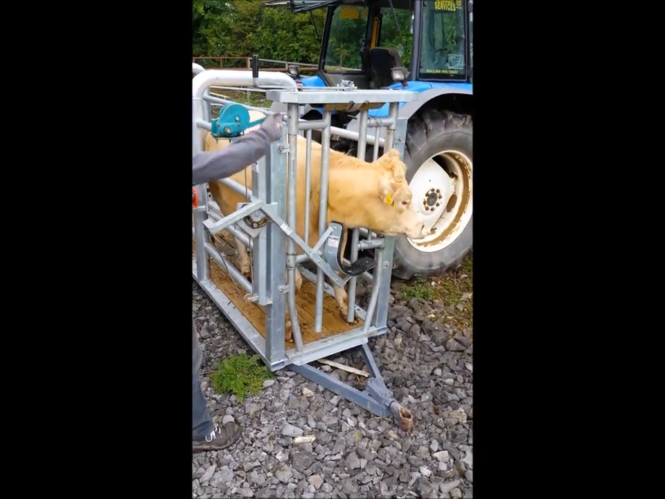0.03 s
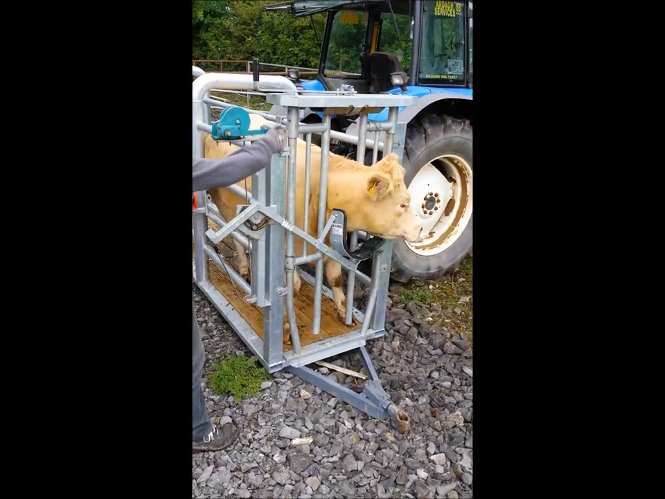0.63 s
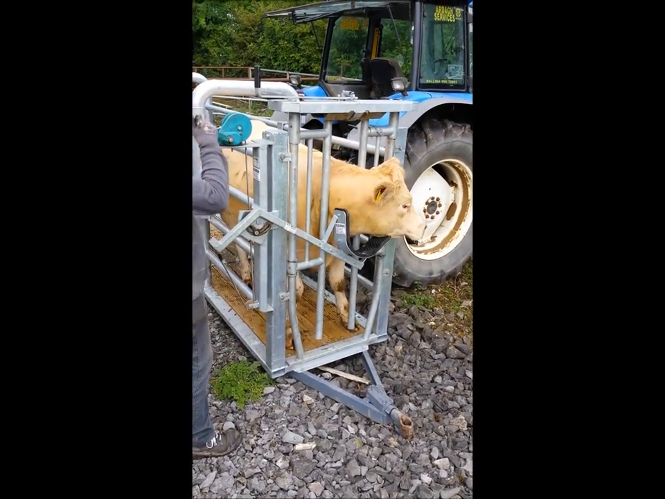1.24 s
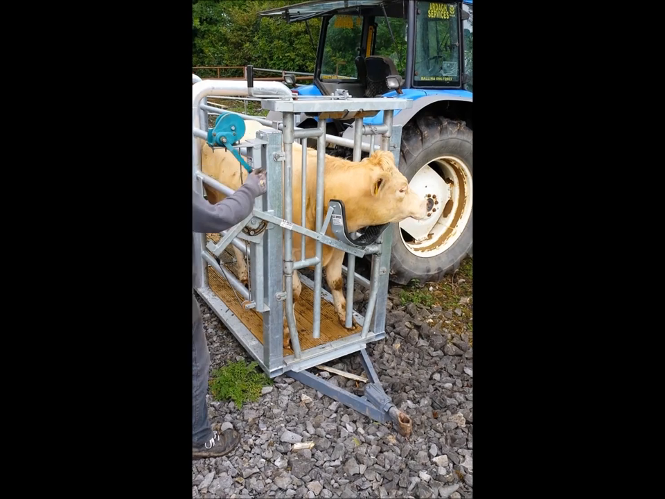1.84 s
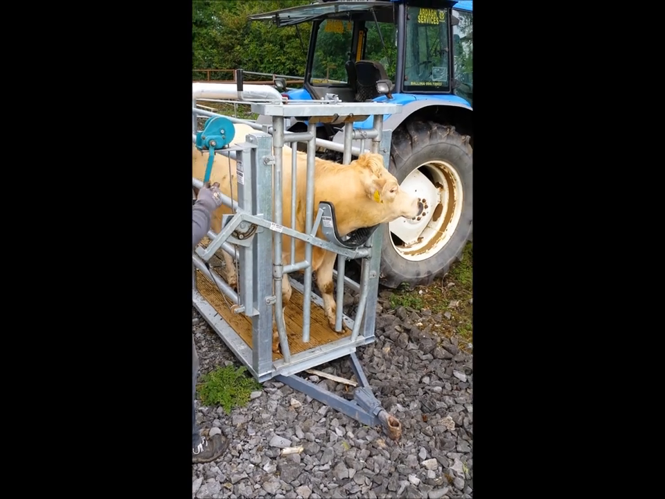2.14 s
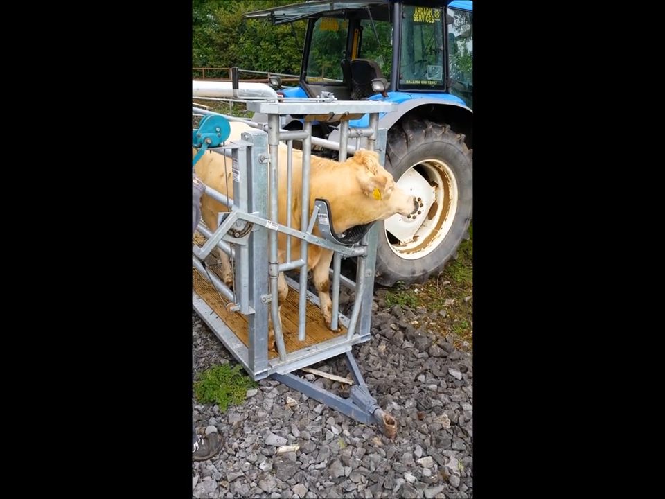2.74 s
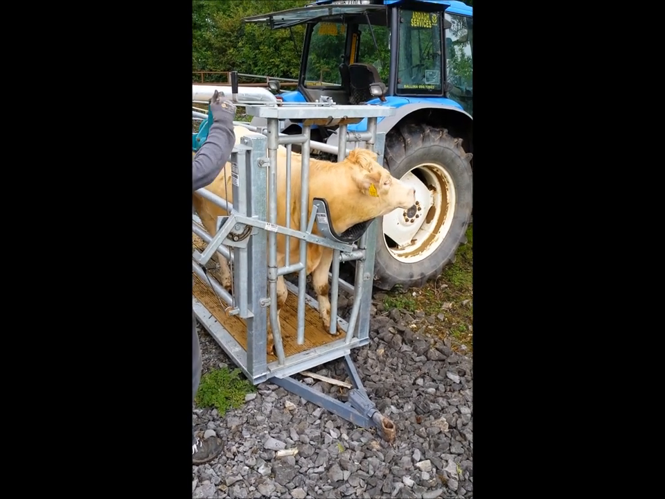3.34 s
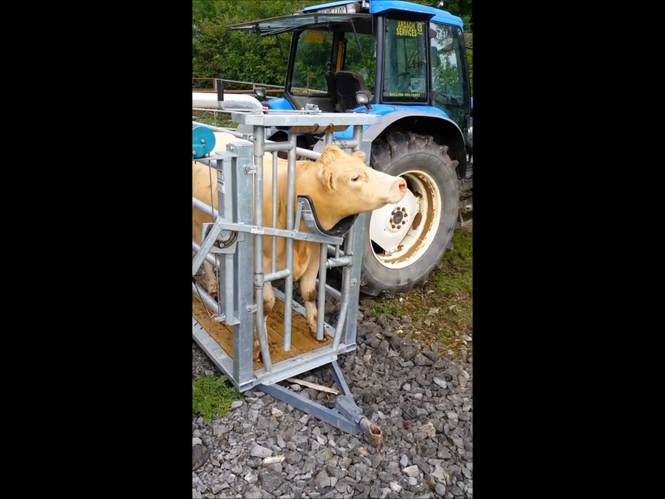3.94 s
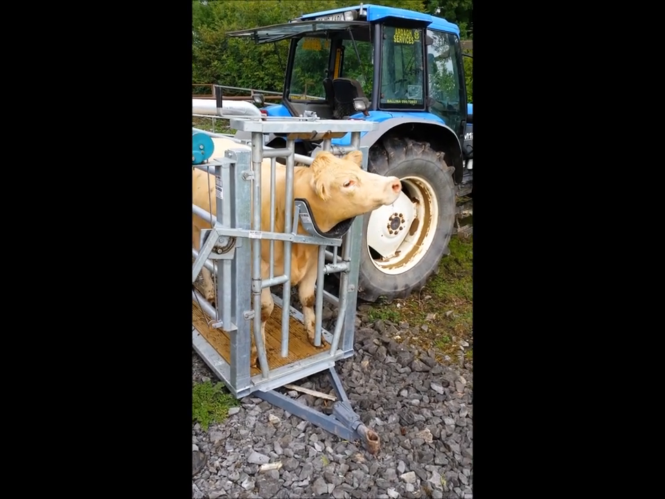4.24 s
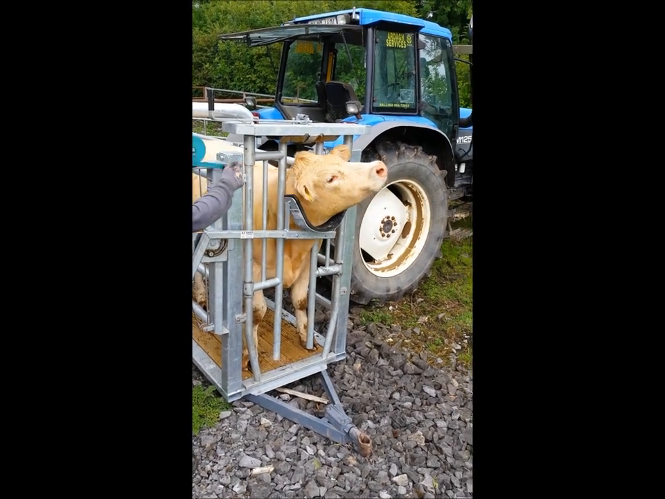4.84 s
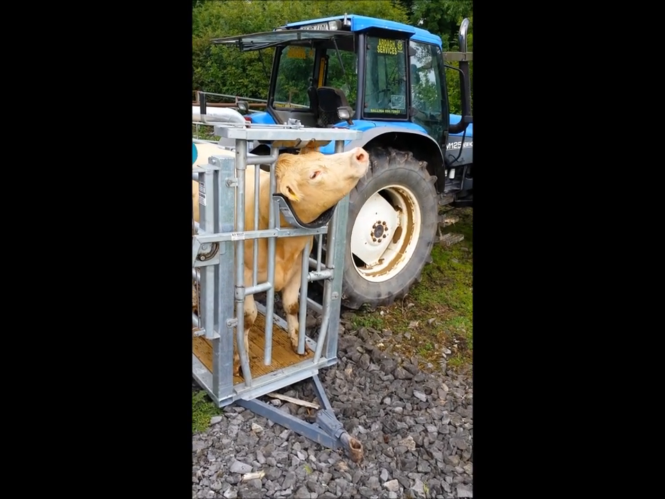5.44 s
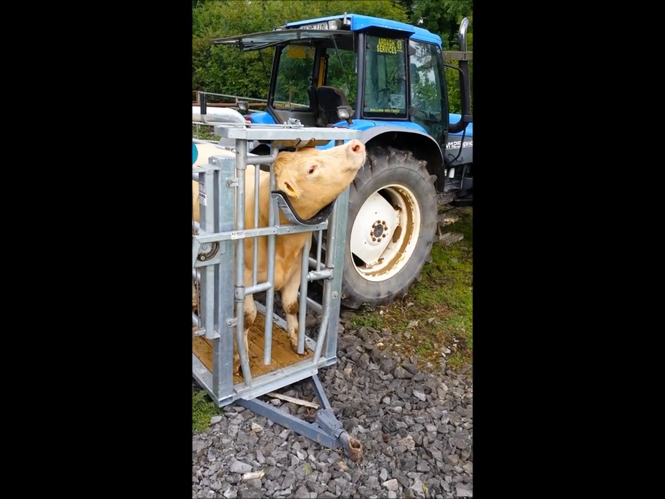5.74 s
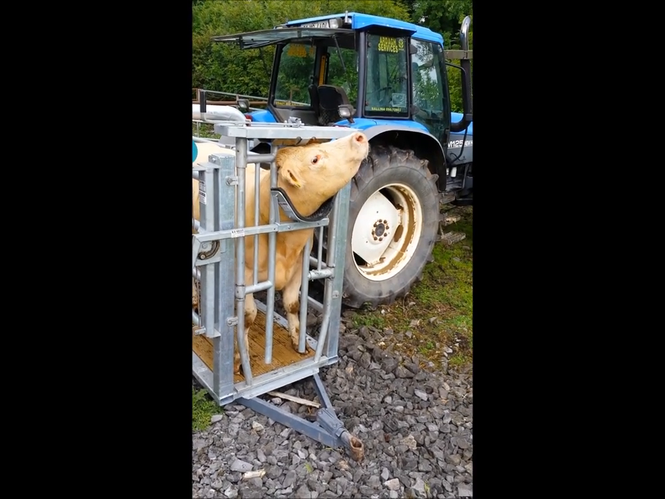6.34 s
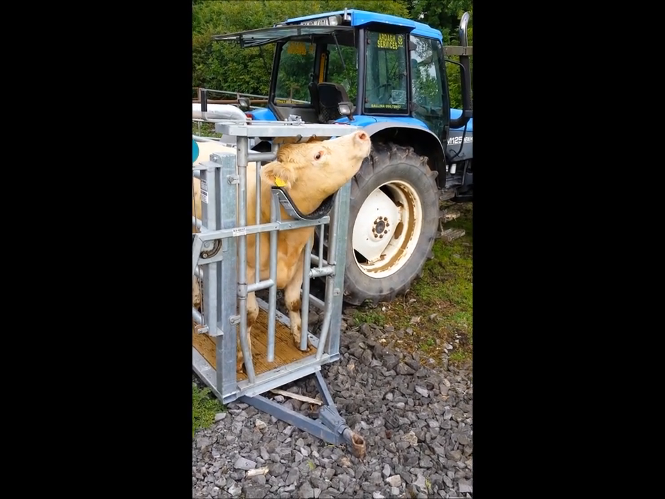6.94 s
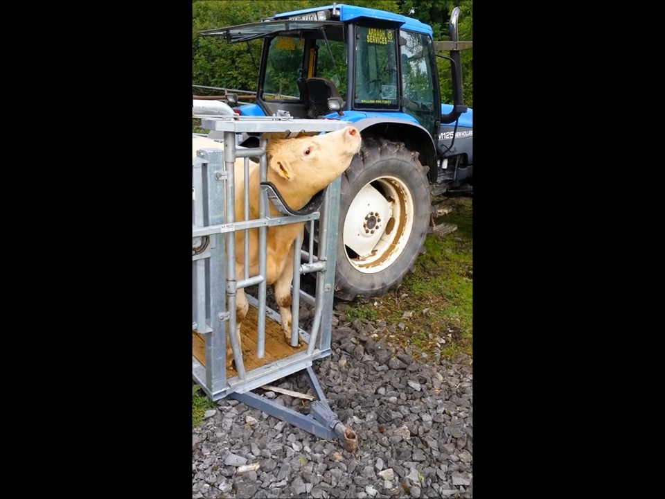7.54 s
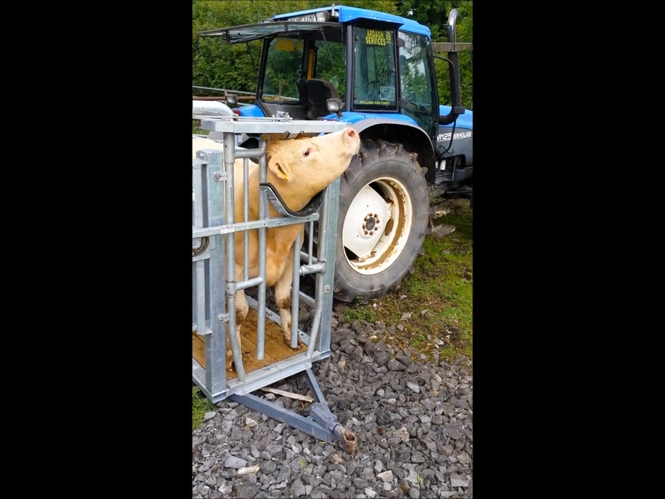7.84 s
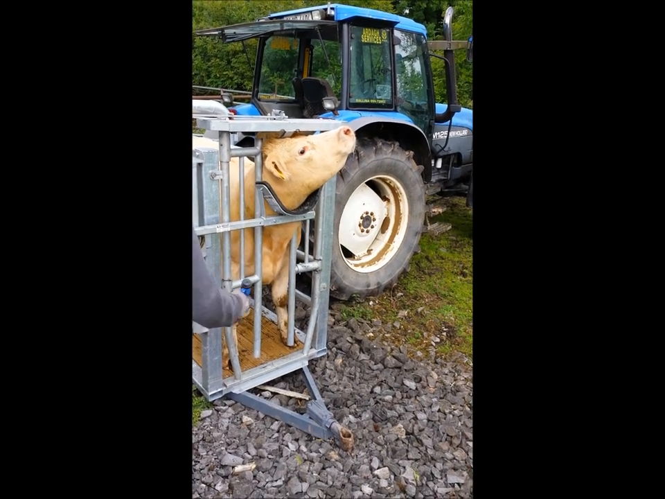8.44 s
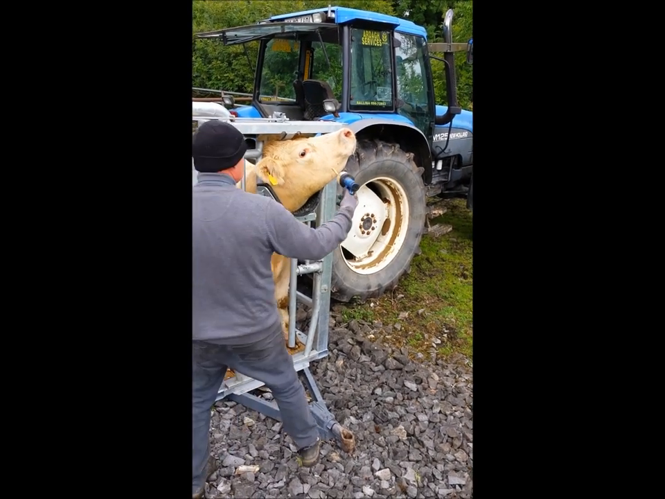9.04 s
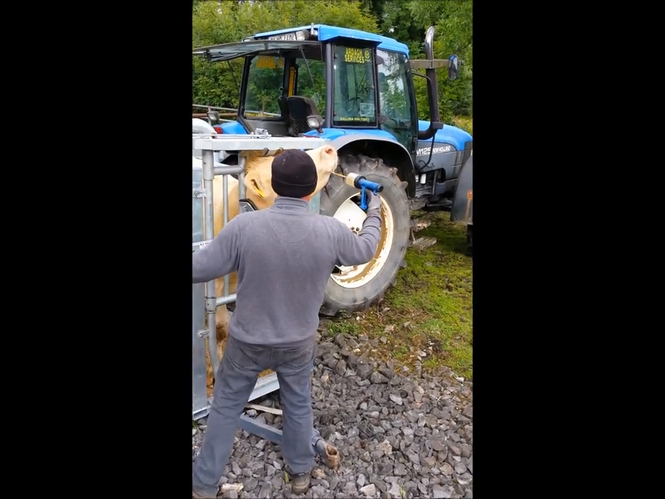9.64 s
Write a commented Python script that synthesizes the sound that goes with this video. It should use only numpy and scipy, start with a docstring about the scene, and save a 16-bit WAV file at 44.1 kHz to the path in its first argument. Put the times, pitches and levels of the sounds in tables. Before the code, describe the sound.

A hand winch on a steel cattle crush starts at once with very fast, bright, ringing ratchet clicks, and a loose steel part rings once. From about 1 second the clicks slow into uneven runs, pausing briefly around 2.5 seconds, where soft wind puffs touch the microphone and a bird whistles thinly. The animal bumps the panels with dull booms, faint at first and stronger from 3 to 4.5 seconds. A loud steel clank lands just after 4 seconds, and several more follow between 5.3 and 5.8. The ratchet stops at about 6 seconds. Boots then grind over gravel until nearly 10 seconds, with sharp cracks of stones loudest from 7.5 to 8.7, while small birds chirp faintly. Quiet outdoor air and rustling leaves run underneath. All of this is on the left; the right holds only steady microphone hiss.

```python
"""Fast, then slower ratchet clicks with steel booms and clanks; then boots on gravel and small birds.
A hand winch lifts the head scoop of a steel cattle crush in an open yard. The pawl drops tooth by
tooth, ringing wheel and frame, while the animal bumps the panels. Stones grind and crack under the
boots; wind puffs and leaves rustle. All of this is on the left; the right is steady microphone hiss."""
import sys
import numpy as np
from scipy import signal
from scipy.fft import rfft, irfft, next_fast_len
from scipy.io import wavfile
from scipy.ndimage import uniform_filter1d, minimum_filter1d, map_coordinates

SR = 44100
rng = np.random.default_rng(int(sys.argv[2]) if len(sys.argv) > 2 else 0)


def materialize(psi):
    """Save the field psi as 16-bit PCM at rate SR to the path in sys.argv[1].

    A 1-D psi becomes a single channel; in a 2-D psi each row is a channel.
    """
    bounded = np.clip(np.atleast_2d(psi).T, -1, 1)
    quanta = np.round(bounded * 32767).astype(np.int16)
    wavfile.write(sys.argv[1], SR, quanta)


N = 427769
RING_TIME_S = np.arange(SR // 2) / SR

# Pushes on the crank. Each row: start in seconds, teeth passed, first, middle and last gap in seconds.
CRANK_PUSHES = [(0.0003, 13, .0241, .0232, .0275), (.3257, 14, .0368, .0301, .024),
                (.748, 8, .0306, .0358, .0865), (1.1748, 8, .069, .0437, .0809),
                (1.6512, 7, .0452, .0416, .0429), (1.9547, 4, .0818, .1481, .125),
                (2.8398, 5, .097, .0657, .0683), (3.2489, 4, .0768, .0829, .0649),
                (3.5356, 6, .0591, .0524, .0317), (3.8174, 4, .0476, .063, .0564),
                (4.045, 4, .0708, .1153, .0753), (4.391, 6, .0946, .064, .0797),
                (4.8206, 7, .0517, .0468, .0704), (5.2188, 5, .0777, .1062, .147),
                (5.739, 4, .0855, .0852, .1104)]
# Each row: time in seconds, click level in dB, toothed wheel's resonance in Hz.
CLICK_CURVE = [(0, -18, 5620), (.15, -17, 6230), (.3, -17.6, 5420), (.5, -18, 5450), (.7, -17.5, 6630),
               (.95, -17.5, 5220), (1.42, -20, 5700), (1.8, -18.5, 5470), (2.2, -20, 5540),
               (2.85, -17.5, 5440), (3.15, -20, 5820), (3.78, -18, 5710), (4.08, -21.5, 5940),
               (4.45, -18.5, 6430), (4.74, -22, 6320), (5.0, -18.5, 5740), (5.5, -17, 5790),
               (6.02, -20, 6320)]
# The pawl's lower pings fade as the scoop takes the weight.
# Each row: time in seconds, gain near 2.9 kHz in dB, gain near 4.2 kHz in dB.
PING_CURVE = [(0, 3, 2), (.22, 3, 4.5), (.35, 1, -0.5), (.55, 1.5, 2.5), (.72, 5, 2), (1.05, 2.5, 3),
              (1.35, -0.5, 0), (1.9, -1, 2), (2.1, -3.5, -2.5), (3.1, -3, -1.5), (3.5, .5, -4.5),
              (3.8, -0.5, -2), (4.05, -.5, 1.5), (4.45, -.5, -1.5), (4.85, 0, -2.5), (5.2, -5, -2),
              (5.5, 1, -3), (5.95, -7, -6)]
# Each row: start in seconds, level in dB, tilt in dB per octave, rise in seconds.
ANIMAL_BUMPS = [(1.231, -32.5, -3.5, 0.0066), (1.32, -33, -3, 0.014), (1.868, -32.5, 0, 0.025),
                (2.949, -23, 0, 0.0028), (3.008, -23.5, 1.5, 0.006), (3.056, -24, -2, 0.0035),
                (3.311, -24, 2, 0.0021), (3.466, -21.5, 1, 0.0053), (3.575, -20.5, 1.5, 0.0018),
                (4.552, -18, 1.5, 0.0022), (5.02, -36, 0.5, 0.012)]
# Each row: start in seconds, level in dB, tilt in dB per octave, relative ring of the bars in dB.
STEEL_CLANKS = [(4.1437, -9, -1.6, -22), (5.288, -17.5, -4, -8.5), (5.645, -21, -1, -20),
                (5.658, -21.5, -5, -5), (5.707, -17.5, -3.5, -10), (5.78, -17.5, -1.5, -14.5)]
# Each row: start in seconds, level in dB, rise and t60 in seconds, relative level of the sole in dB.
BOOT_STEPS = [(6.25, -31, 0.0037, 0.16, -9), (6.459, -25.5, 0.0014, 0.15, -10),
              (6.616, -27, 0.0028, 0.15, -6), (7.205, -16, .011, 0.088, -13),
              (7.235, -28.5, 0.0081, 0.4, -6), (7.498, -19.5, 0.0026, 0.15, -19),
              (7.548, -21.5, 0.017, 0.18, -20), (7.583, -15, 0.0095, 0.16, -20),
              (7.817, -21, 0.0025, 0.24, -20), (7.845, -26.5, 0.0069, 0.38, -12),
              (7.921, -23.5, 0.0096, 0.072, -14), (8.051, -36, 0.071, 0.46, -13),
              (8.172, -26.5, 0.0035, 0.21, -16), (8.362, -18, 0.00085, 0.081, -12.5),
              (8.56, -32.5, 0.045, 0.55, -9), (8.655, -19.5, 0.031, 0.18, -4),
              (9.268, -26, 0.0059, 0.46, -9.5), (9.63, -30.5, 0.029, 0.3, -19)]
# Each row: start in seconds, peak in dB, pitch in Hz.
STONE_CRACKS = [(7.508, -6, 6700), (7.519, -5.5, 6050), (7.564, 3.5, 6240), (7.592, -11, 2730),
                (7.6523, -7.5, 6230), (7.7323, -4.5, 6070), (7.7922, -9, 6230), (8.061, -5, 4620),
                (8.1723, -4, 6100), (8.181, -6, 6640), (8.2335, 2, 6900), (8.3635, -2.5, 3500),
                (8.4098, -11.5, 2920), (8.417, -11.5, 3280), (8.6449, 3.5, 6240), (8.793, -7.5, 5270),
                (8.971, -11, 5300)]
# Each row: start and length in seconds, first and last pitch in Hz, relative level in dB.
BIRD_NOTES = [(2.072, 0.13, 8650, 8460, -36.5), (2.404, .099, 8350, 8230, -44),
              (2.557, .23, 8500, 8320, -41.5), (7.409, .038, 4830, 4470, -34),
              (7.664, .039, 3420, 3580, -35), (7.946, .075, 4860, 3900, -37), (8.11, .038, 3480, 3660, -40),
              (8.755, 0.091, 3940, 3450, -35), (8.997, .052, 3850, 2370, -39),
              (9.113, 0.04, 2610, 3700, -42), (9.488, 0.096, 5700, 5400, -40)]
# Each row: centre in seconds, level in dB.
WIND_GUSTS = [(2.087, -37), (2.141, -31), (2.53, -41), (2.645, -34), (2.756, -42.5), (3.244, -41)]
# Air and leaves. Each row: time in seconds, level in dB.
YARD_CURVE = [(0, -37.5), (2, -44), (2.6, -58), (3, -42), (6.2, -46.5), (6.9, -42.5), (7.1, -53),
              (7.4, -41), (8.9, -43.5), (9.15, -51), (9.7, -47)]

# Modes of the steel parts. Each row: frequency in Hz, relative level in dB, t60 in seconds.
PAWL_MODES = [(2730, -6.5, 0.14), (2880, 0, 0.086), (3020, -1, 0.087), (4210, -44, 0.071),
              (4270, -4, 0.088), (4190, 7.5, 0.042), (5100, -2, 0.15), (5440, 5, 0.076), (5730, 6, 0.037),
              (5860, -4, 0.23), (6630, 4, 0.086), (7130, -2, 0.066), (8050, -3, 0.051), (12700, -20, .1)]
FRAME_MODES = [(591, -13, 1), (1034, -8.5, 0.39), (1503, -2, 0.26), (2023, -6, 0.58), (2180, -19, 0.49),
               (2537, 5.5, 0.31), (2985, 5.5, 0.37), (3540, 1, 0.37), (3700, 4, 0.2), (4220, -8, 0.32),
               (5000, -1, 0.3), (5250, 8, 0.24), (5604, -8, .25), (6011, -9, 0.27), (6500, 5, 0.36),
               (6800, -1, 0.35)]
PANEL_MODES = [(221, -5, 0.4), (254.5, -2.5, 0.15), (286, 0, 0.16), (351.7, -8.5, 0.38), (541, -5, 0.32),
               (640, -4.5, 0.45), (694, -3.5, 0.33), (740, -4.5, 0.27), (806, -2.5, 0.19),
               (915, 6.5, 0.073), (903, -3.5, 0.26), (1077, -3, 0.12), (1160, -9, 0.37), (1390, -18, 0.33),
               (1500, -21, .2), (1610, -7, 0.18), (2080, -16, 0.27)]
CHIME_MODES = [(1080, -12, 1), (2880, 0, 0.28), (3980, 7, 0.2), (8000, 1, 0.22)]

# Noise spectra. Each row: frequency in Hz, relative density in dB.
SNAP_SPECTRUM = [(150, -25), (400, -17), (1000, -9.5), (2100, -10), (2500, -3), (2900, 4), (3400, -3),
                 (4200, 1), (5300, -1), (6700, -1.5), (7500, -7.5), (8500, -9.5), (10500, -16),
                 (12000, -29), (15000, -41)]
THUD_SPECTRUM = [(60, -23), (160, -13), (230, 1.5), (400, -4), (700, 3), (950, 0.5), (1150, -5), (1600, -1),
                 (2200, -15), (5000, -12), (12000, -44)]
CLASH_SPECTRUM = [(100, -39), (220, -33), (400, -17), (800, -4.5), (1300, 0), (2000, -2.5), (2700, 8),
                  (3500, 1), (4200, 3), (6500, 9.5), (8000, 2.5), (10500, -2), (12000, -17), (15000, -33)]
GRIT_SPECTRUM = [(600, -37), (1200, -5.5), (2100, -10), (2800, -1), (4200, -1.5), (6400, 2.5), (8000, -2),
                 (10000, -10.5), (13000, -19), (15000, -58)]
SOLE_SPECTRUM = [(30, -24), (90, -11), (220, -2), (330, 1), (800, -6), (1200, -8), (2000, -21), (5000, -40)]
GUST_SPECTRUM = [(20, -22), (50, -18), (70, -16), (95, -3), (170, -7), (300, -22), (800, -45), (3000, -70)]
YARD_SPECTRUM = [(30, -16), (200, 4), (450, -3), (1000, -4.5), (2000, -7), (3000, -4.5), (6000, 0.5),
                 (8500, -4), (11000, -19), (15000, -27)]
HISS_SPECTRUM = [(25, -11), (70, -6), (130, 2), (230, 2), (450, 1), (1000, -0.5), (2200, -1.5),
                 (4200, -4.5), (8000, -7.5), (13000, -10.5), (16000, -15)]


def ratchet(repeat_share=0.74, pitch_scatter=0.01195, tick_db=-10.5, wheel_db=-4.5, frame_db=-14):
    """The pawl drops, pings and chatters; the wheel's ring swells behind it and the frame sings on."""
    out, frame_tones, pawl_tones = np.zeros(N), modes(FRAME_MODES), modes(PAWL_MODES)
    housing = noise()
    tail = gain(-15) * decay(0.62)
    for start_s in tooth_times():
        level_db, wheel_hz = curve_at(CLICK_CURVE, start_s)
        level_db += 0.9 * rng.standard_normal()
        wheel_hz *= 1 + 0.017 * rng.standard_normal()
        colour_db = np.array([*curve_at(PING_CURVE, start_s), 2])
        low_db, mid_db, top_db = colour_db + 1.17 * rng.standard_normal(3)
        # the housing's dense modes repeat from tooth to tooth, the contact does not
        contact = np.sqrt(repeat_share) * housing + np.sqrt(1 - repeat_share) * noise()
        snap = unit_blow(shaped(contact, SNAP_SPECTRUM) * np.hypot(decay(0.14), tail) * rise(0.00037))
        ping = ring(pawl_tones, scatter_db=5.5)
        pitch_ratio = 1 + pitch_scatter * rng.standard_normal()  # the pawl seats differently each time
        ping = map_coordinates(ping, [SR * RING_TIME_S * pitch_ratio]) * rise(0.00033)
        pawl = unit_blow(pawl_bounce(snap + ping))
        tick = unit_blow(shaped(noise(), SNAP_SPECTRUM, tilt_db_per_oct=2) * decay(0.038))
        knock = contact[::-1] * np.hypot(decay(0.07), 0.5 * tail)
        wheel = unit_blow(wheel_ring(knock, wheel_hz))
        frame = ring(frame_tones, scatter_db=5.5) * rise(0.00043)
        click = pawl + gain(tick_db) * tick + gain(wheel_db) * wheel + gain(frame_db) * frame
        colour = [(2150, 0), (2600, low_db), (3200, low_db), (3700, mid_db), (4700, mid_db),
                  (5200, 0), (7000, 0), (7900, top_db)]
        add(out, start_s, gain(level_db) * unit_blow(shaped(click, colour)))
    return out


def tooth_times():
    """Pawl drops in seconds; the handle changes speed smoothly within each push."""
    times_s = []
    for start_s, teeth, *key_gaps_s in CRANK_PUSHES:
        parabola = np.polyfit([0, 0.5, 1], key_gaps_s, 2)
        gaps_s = np.polyval(parabola, np.linspace(0, 1, round(teeth) - 1))
        times_s += [start_s, *(start_s + np.cumsum(gaps_s))]
    return times_s


def pawl_bounce(landing, spacing_s=0.004, rebound=0.44):
    """Three uneven rebounds carve shifting pings into the pawl's tone."""
    out = landing.copy()
    for k, (late, strength) in enumerate(rng.random((3, 2))):
        add(out, spacing_s * (k + 0.1 + late), rebound * (0.6 + 0.4 * strength) * landing)
    return out


def wheel_ring(knock, wheel_hz, lag_s=0.0091, half_width_hz=680):
    """Waves near the wheel's resonance are strongest and held back longest."""
    hz = np.fft.rfftfreq(len(knock), 1 / SR)
    nearness = 1 / (1 + ((hz - wheel_hz) / half_width_hz) ** 2)
    phase_turns = np.cumsum(lag_s * nearness) * hz[1]
    return irfft(rfft(knock) * nearness ** 0.9 * np.exp(-2j * np.pi * phase_turns), len(knock))


def bumps(thud_db=-3, joint_db=-10):
    """The animal's soft, heavy blows boom in the panels and shake their loose joints."""
    out, panel_tones = np.zeros(N), modes(PANEL_MODES)
    radiation = [(50, -11), (170, 2), (16000, -5.5)]  # open panels give off little deep bass
    for start_s, level_db, tilt_db_per_oct, rise_s in ANIMAL_BUMPS:
        panels = ring(panel_tones, scatter_db=1.5)
        thud = gain(thud_db) * unit_blow(shaped(noise(), THUD_SPECTRUM) * decay(0.36))
        joints = gain(joint_db) * unit_blow(shaped(noise(), CLASH_SPECTRUM) * decay(0.046))
        blow = (panels + thud) * rise(rise_s) + joints * rise(rise_s / 2)
        add(out, start_s, gain(level_db) * unit_blow(shaped(blow, radiation, tilt_db_per_oct)))
    return out


def clanks(tail_db=-7, panel_db=-18):
    """Steel slams on steel: a crack, a dense clash, ringing bars and panels."""
    out, frame_tones, panel_tones = np.zeros(N), modes(FRAME_MODES), modes(PANEL_MODES)
    envelope = decay(0.1) + gain(tail_db) * decay(0.46)
    # the parts stay pressed together, which damps the bars' upper modes
    damping = [(590, 2.5), (1030, 5), (1500, 1), (2600, -16), (6000, -18)]
    for start_s, level_db, tilt_db_per_oct, bars_db in STEEL_CLANKS:
        clash = unit_blow(shaped(noise(), CLASH_SPECTRUM, tilt_db_per_oct) * envelope)
        bars = unit_blow(shaped(ring(frame_tones, scatter_db=6.5), damping) * decay(2))
        blow = clash + gain(bars_db) * bars + gain(panel_db) * ring(panel_tones, scatter_db=2.5)
        add(out, start_s, gain(level_db) * unit_blow(blow * rise(0.00043)))
    return out


def chime(start_s=0.188, level_db=-19.5):
    """A loose steel part rings once during the fast spin."""
    out = np.zeros(N)
    tone = modes(CHIME_MODES).sum(0).imag * rise(0.002)
    add(out, start_s, gain(level_db) * unit_blow(tone))
    return out


def steps(grains_per_s=1900, spread_db=4, sand_ratio=0.67):
    """Small stones grind under each boot, over the dull push of the sole."""
    out, size = np.zeros(N), len(RING_TIME_S)
    for start_s, level_db, rise_s, t60_s, sole_db in BOOT_STEPS:
        impulses = (rng.random(size) < grains_per_s / SR) * rng.choice([-1, 1], size)
        grains = impulses * gain(spread_db * np.minimum(rng.exponential(1, size), 4))
        crunch = unit_rms(shaped(unit_rms(grains) + sand_ratio * noise(), GRIT_SPECTRUM))
        sole = gain(sole_db) * unit_rms(shaped(noise(), SOLE_SPECTRUM))
        pressure = rise(rise_s) * np.interp(RING_TIME_S - rise_s, RING_TIME_S, decay(t60_s))
        add(out, start_s, gain(level_db) * pressure * (crunch + sole))
    return out


def stones(t60_s=0.0065, echo_db=-28):
    """Flat stones crack together, crush grit and ring briefly; the yard scatters each tick."""
    out = np.zeros(N)
    # Each row: pitch ratio, relative level in dB, t60 ratio.
    partials = [(0.47, -4, 1), (0.62, -40, 0.98), (0.82, 3, 0.88),
                (1, 11, 1), (1.13, 10.5, 0.8), (1.42, 4.5, 0.55)]
    for start_s, peak_db, pitch_hz in STONE_CRACKS + pebbles():
        tone = 0
        for ratio, db, life in partials:
            hz = pitch_hz * ratio * rng.uniform(0.82, 1.163)
            tone += gain(db) * np.sin(2 * np.pi * hz * RING_TIME_S) * decay(t60_s * life)
        grit = 0.097 * unit_rms(shaped(noise(), GRIT_SPECTRUM)) * decay(0.0027)
        tick = (tone + grit) * rise(2 / pitch_hz)  # contact lasts about two cycles
        echo = gain(echo_db) * unit_rms(shaped(noise(), GRIT_SPECTRUM)) * decay(0.19)
        add(out, start_s, gain(peak_db) * (tick / abs(tick).max() + echo))
    return out


def pebbles(mean_lag_s=0.035, above_step_db=5, pitch_hz=6420):
    """Each step tips two pebbles; rows as in STONE_CRACKS."""
    return [(start_s + mean_lag_s * rng.exponential(),
             level_db + above_step_db + 2 * rng.standard_normal(), pitch_hz)
            for start_s, level_db, *_ in BOOT_STEPS for _ in range(2)]


def birds(waver_hz=170, direct_db=-5, echo_db=-8, echo_t60_s=0.49):
    """Thin wavering whistles from the hedge, blurred by its echoes."""
    calls = np.zeros(N)
    for start_s, length_s, first_hz, last_hz, level_db in BIRD_NOTES:
        progress = np.linspace(0, 1, int(length_s * SR))
        waver = unit_rms(uniform_filter1d(noise(len(progress)), size=50))
        hz = first_hz + (last_hz - first_hz) * progress + waver_hz * waver
        whistle = np.sin(2 * np.pi * np.cumsum(hz) / SR) * np.sqrt(abs(np.sin(np.pi * progress)))
        add(calls, start_s, gain(level_db) * unit_rms(whistle))
    response = noise() * decay(echo_t60_s)
    echo = signal.fftconvolve(calls, response / np.linalg.norm(response))[:N]
    return gain(direct_db) * calls + gain(echo_db) * echo


def gusts(puff_s=0.0498, swirl_s=0.41, swirl_db=-13.5):
    """Wind buffets the microphone: low puffs, each inside a longer, weaker swirl."""
    out = np.zeros(N)
    for centre_s, level_db in WIND_GUSTS:
        for length_s, part_db in [(puff_s, 0), (swirl_s, swirl_db)]:
            size = int(length_s * SR)
            air = shaped(noise(), GUST_SPECTRUM)[:size] * signal.windows.tukey(size, 0.6)
            add(out, centre_s - length_s / 2, gain(level_db + part_db) * unit_rms(air))
    return out


def yard(flutter_db=3.5):
    """Faint outdoor air and rustling leaves."""
    time_s, knots_s = np.arange(N) / SR, np.linspace(0, N / SR, 200)
    flutter = np.interp(time_s, knots_s, noise(len(knots_s)))
    level_db = np.interp(time_s, *np.transpose(YARD_CURVE)) + flutter_db * flutter
    return gain(level_db) * unit_rms(shaped(noise(N), YARD_SPECTRUM))


def modes(table):
    """One decaying complex tone per mode."""
    return np.array([gain(db) * decay(t60_s) * np.exp(2j * np.pi * hz * RING_TIME_S)
                     for hz, db, t60_s in table])


def ring(tones, scatter_db):
    """Each blow lands elsewhere and wakes the modes in new proportions."""
    strengths = gain(scatter_db * rng.standard_normal(len(tones)))
    phasors = np.exp(2j * np.pi * rng.random(len(tones)))
    return unit_blow(((strengths * phasors) @ tones).real)


def shaped(x, spectrum, tilt_db_per_oct=0):
    """Filters by (Hz, dB) points, tilted about 1 kHz."""
    hz, db = np.transpose(spectrum)
    size = next_fast_len(len(x) + 2048)
    octave = np.log2(np.fft.rfftfreq(size, 1 / SR) + 20)
    response_db = np.interp(octave, np.log2(hz), db) + tilt_db_per_oct * (octave - 10)
    return irfft(rfft(x, size) * gain(response_db), size)[:len(x)]


def decay(t60_s):
    """Falls 60 dB in t60_s."""
    return np.exp(-np.log(1000) * RING_TIME_S / max(t60_s, 0.001))


def rise(rise_s):
    """Smooth ramp from 0 to 1."""
    return np.sin(np.pi / 2 * np.minimum(RING_TIME_S / max(rise_s, 1e-4), 1)) ** 2


def noise(size=len(RING_TIME_S)):
    """White noise."""
    return rng.standard_normal(size)


def gain(db):
    """Decibels to amplitude."""
    return 10 ** (np.asarray(db) / 20)


def unit_rms(x):
    """Scales to rms 1."""
    return x / np.sqrt(np.mean(x ** 2) + 1e-20)


def unit_blow(x):
    """Scales to rms 1 over the first 25 ms."""
    return x / np.sqrt(np.mean(x[:SR // 40] ** 2) + 1e-20)


def curve_at(curve, time_s):
    """Interpolates each value column."""
    times_s, *columns = np.transpose(curve)
    return [np.interp(time_s, times_s, column) for column in columns]


def add(mix, start_s, sound):
    """Mixes a sound in at start_s."""
    part = mix[max(round(start_s * SR), 0):][:len(sound)]
    part += sound[:len(part)]


def scene(hiss_db=-37.5):
    """The yard on the left, plain hiss on the right."""
    left = ratchet() + bumps() + clanks() + chime() + steps() + stones() + birds() + gusts() + yard()
    right = gain(hiss_db) * unit_rms(shaped(noise(N), HISS_SPECTRUM))
    return np.array([left, right])


def record(dry, ceiling_db=-0.5, recovery_db_per_s=60, cutoff_hz=14700):
    """A limiter ducks both channels at the sharpest peaks; a low-pass follows."""
    peak_db = 20 * np.log10(abs(dry).max(0) + 1e-9)
    recovery_db = np.arange(N) * recovery_db_per_s / SR
    held_db = np.maximum.accumulate(peak_db + recovery_db) - recovery_db
    over_db = np.maximum(held_db - ceiling_db, 0)
    duck_db = uniform_filter1d(minimum_filter1d(-over_db, size=64), size=64)
    lowpass = signal.firwin(301, cutoff_hz, window=("kaiser", 8), fs=SR)
    return signal.oaconvolve(dry * gain(duck_db), lowpass[None], "same")


dry = scene()
out = record(dry)
materialize(out)
```